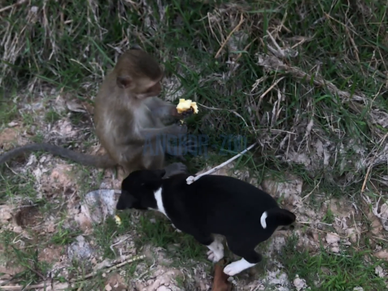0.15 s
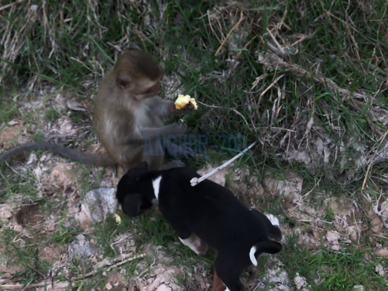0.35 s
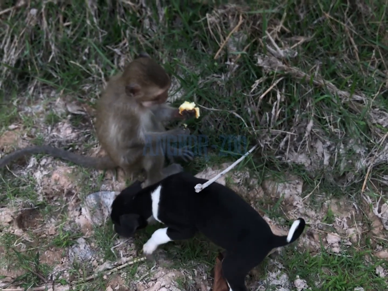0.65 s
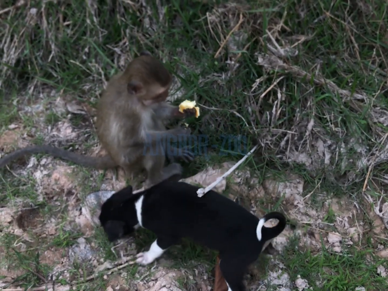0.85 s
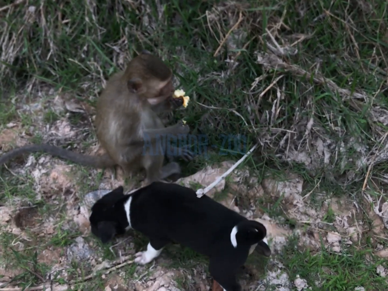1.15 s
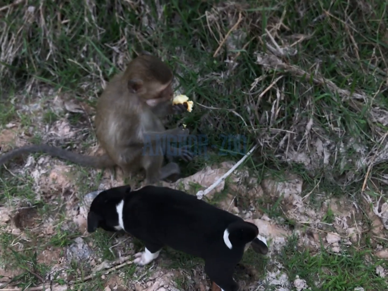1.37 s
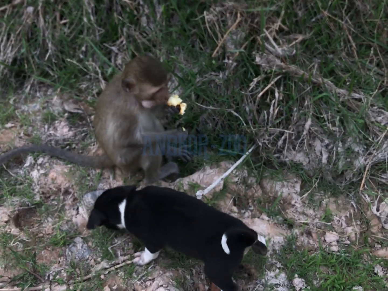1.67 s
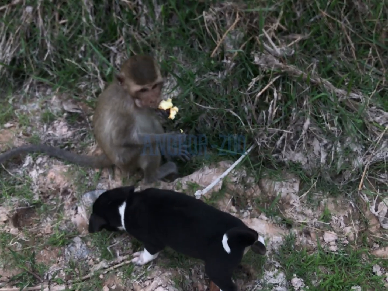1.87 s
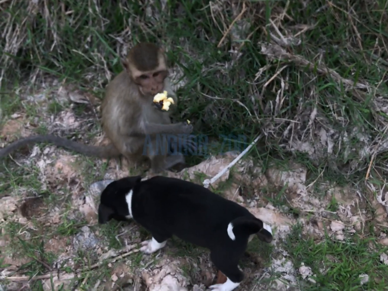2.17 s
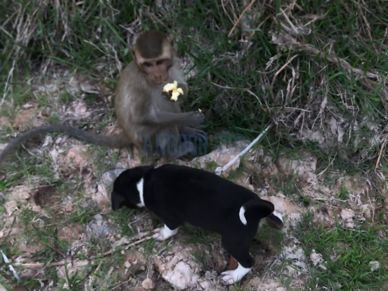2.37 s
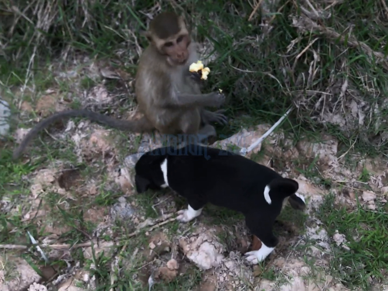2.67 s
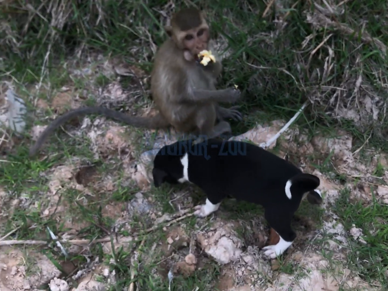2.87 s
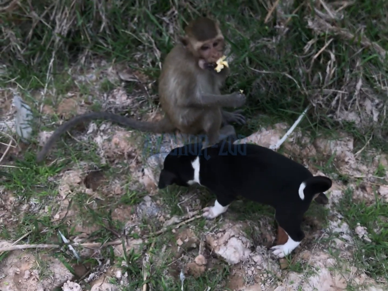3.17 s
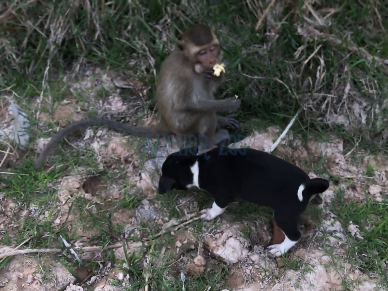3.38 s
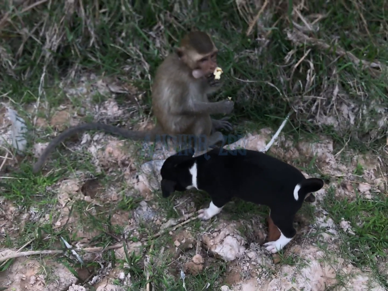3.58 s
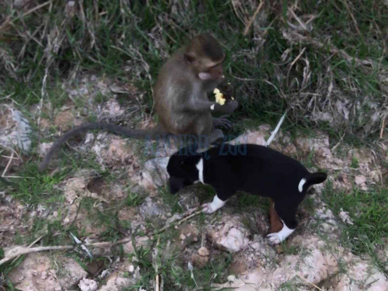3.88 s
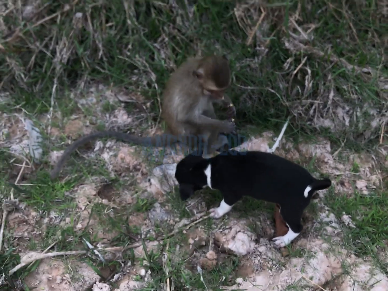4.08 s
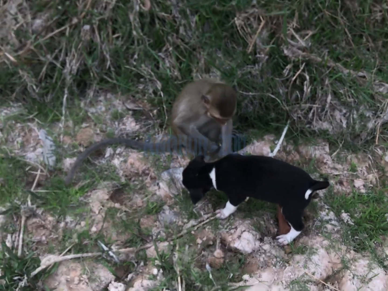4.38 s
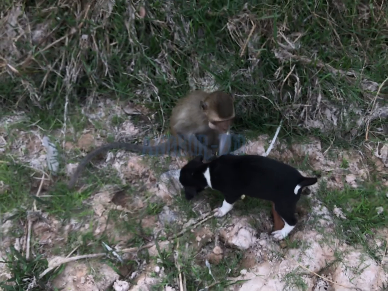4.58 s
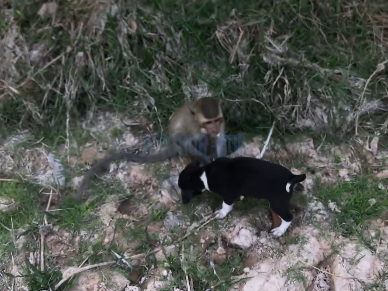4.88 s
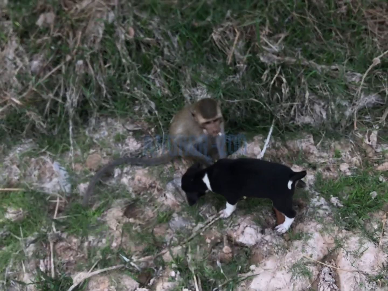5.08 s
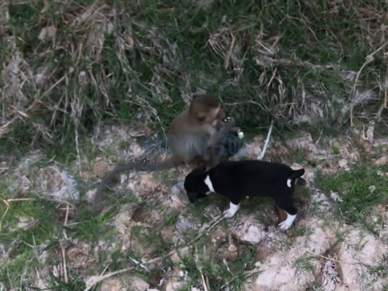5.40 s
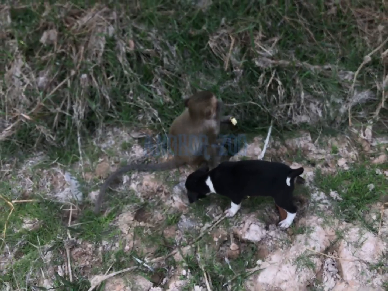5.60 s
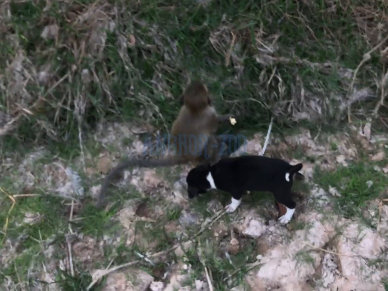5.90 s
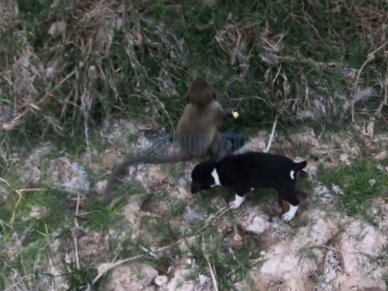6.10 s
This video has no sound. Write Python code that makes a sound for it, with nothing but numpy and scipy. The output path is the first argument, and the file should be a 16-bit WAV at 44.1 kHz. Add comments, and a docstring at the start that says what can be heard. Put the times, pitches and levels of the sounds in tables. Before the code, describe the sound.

On a grassy bank, a quick crackle of dry stalks is followed by light rustling and ticks of soil under paws. Throughout, a bird sings phrases of clear gliding whistles and a cricket repeats a thin buzz that slowly grows louder. Dull bumps and a knock touch the hand-held microphone, mostly in the second half. A low, distant engine rumble and soft outdoor hiss lie underneath.

```python
"""A songbird whistles phrases of scoops, falls, rises and held notes that scatter in the trees.
A bush cricket buzzes with its wings in swelling bursts; a second one pulses far off. On the grassy
bank, where a young monkey eats beside a puppy, dry stalks snap, grit ticks and grass rustles.
The hand-held camera knocks and thumps softly; an engine idles far off under open air and thin tones."""
import sys
import numpy as np
from scipy import signal
from scipy.fft import rfft, irfft
from scipy.io import wavfile
from scipy.ndimage import uniform_filter1d

SR = 44100
rng = np.random.default_rng(int(sys.argv[2]) if len(sys.argv) > 2 else 0)


def int16_out(signal):
    """Quantize to a 16-bit WAV file."""
    q = np.round(np.clip(np.atleast_2d(signal).T, -1, 1) * 32767)
    wavfile.write(sys.argv[1], SR, q.astype(np.int16))


N = 275625
TIME = np.arange(N) / SR

# spectrum of breaking dry fibre: freq_hz, gain_db
FIBRE_SPECTRUM = [(240, -49), (400, -20), (588, -24.5), (1090, -10.5), (1180, -17), (1870, -8.5),
                  (2880, -10), (3420, -4.5), (4650, -9), (7870, -11.5), (12300, -6), (14100, 2),
                  (16000, -22)]


def bird(flutter_db=2, overtone_db=-36, gain_db=-3.0, attack_s=.014, release_s=.0096):
    """Nearly pure whistles from the syrinx; pitch is least steady in fast glides."""
    out = np.zeros(N)
    waver = walk(260) + .8 * walk(55)
    flutter = undb(flutter_db * walk(60))
    for span, hz, db in [*scoops(), *falls(), *rises(), *holds()]:
        t = TIME[span]
        envelope = np.minimum((t - t[0]) / attack_s, 1) * np.minimum((t[-1] - t) / release_s, 1)
        glide_per_s = np.abs(np.gradient(np.log(hz))) * SR
        pitch_hz = hz * (1 + (.004 + .0035 * np.minimum(glide_per_s, 4)) * waver[span])
        whistle = tone(pitch_hz) + undb(overtone_db) * tone(2 * pitch_hz)
        out[span] += np.sqrt(2) * undb(db + gain_db) * envelope * whistle
    return foliage(out * flutter, t60_s=.68, wet_db=-4.5, near_db=-5.5, near_t60_s=.15)


def scoops(top_hz=3017, ref_depth_hz=600, down_s=.072, up_s=.088, entry_db=3.5, swell_db=8):
    """Pitch dips and climbs back, growing louder; shallow scoops are quicker."""
    # trough_s, end_s, low_hz, last_hz, relative_db
    notes = [(0.011, 0.104, 2293, 2848, -39), (0.229, 0.317, 2532, 2908, -40),
             (0.421, 0.466, 2643, 2800, -41), (2.402, 2.5, 2315, 2995, -44),
             (2.617, 2.693, 2450, 2883, -38.5), (2.802, 2.934, 2540, 2875, -42),
             (5.079, 5.161, 2315, 3100, -40), (5.288, 5.371, 2327, 2964, -40.5),
             (5.486, 5.572, 2648, 2880, -40)]
    for trough_s, end_s, low_hz, last_hz, db in notes:
        depth_hz = max(top_hz - low_hz, 1)
        stretch = np.sqrt(depth_hz / ref_depth_hz)
        span, _ = note_span(trough_s - stretch * down_s, end_s)
        t = (TIME[span] - trough_s) / stretch
        down = np.minimum(t / down_s, 0) ** 2
        up = np.sin(np.pi / 2 * np.clip(t / up_s, 0, 1)) ** 2
        pitch_hz = low_hz + depth_hz * down + (last_hz - low_hz) * up
        yield span, pitch_hz, db - entry_db * down + swell_db * up


def falls(ease=.0422, entry_db=4.5, entry_s=.017, fade_db=6):
    """Downward slides that start softly, ease midway and fade near the end."""
    # start_s, end_s, first_hz, last_hz, relative_db
    notes = [(.588, .72, 3660, 3080, -39), (.865, 1.08, 4380, 2080, -37.5), (2.93, 3.11, 3560, 2860, -38),
             (3.332, 3.53, 4300, 2000, -37), (5.58, 5.79, 3680, 2800, -37),
             (5.912, 6.095, 4150, 2420, -33.5)]
    for start_s, end_s, first_hz, last_hz, db in notes:
        span, progress = note_span(start_s, end_s)
        cut_db = entry_db * np.exp(-(TIME[span] - start_s) / entry_s) + fade_db * progress ** 4
        travel = progress + ease * np.sin(2 * np.pi * progress)
        yield span, first_hz * (last_hz / first_hz) ** travel, db - cut_db


def rises():
    """Climbing whistles; some overlap, from the two sides of the syrinx."""
    # start_s, end_s, first_hz, last_hz, bend (1 = straight), relative_db
    notes = [(.495, 0.592, 2740, 2960, 0.91, -38), (1.202, 1.514, 3525, 4670, 1.92, -41),
             (1.253, 1.43, 2650, 3260, 1.4, -52.5), (1.656, 1.736, 3850, 4320, 0.84, -41),
             (1.95, 2.09, 2900, 3310, 1.08, -49), (2.016, 2.076, 3950, 4310, 1.04, -45.5),
             (2.069, 2.162, 3140, 3937, 0.91, -38), (3.718, 4.035, 3486, 4835, 1.85, -40),
             (3.787, 3.947, 2810, 2980, 1.2, -55), (4.207, 4.266, 3880, 4430, 1.35, -40.5),
             (4.496, 4.67, 3170, 3450, 2.8, -52.5), (4.648, 4.72, 3266, 3438, 0.85, -37)]
    for start_s, end_s, first_hz, last_hz, bend, db in notes:
        span, progress = note_span(start_s, end_s)
        yield span, first_hz + (last_hz - first_hz) * progress ** bend, db


def holds(slide_hz=226, slide_s=.01405):
    """A quick slide up to a pitch that then barely drifts."""
    # start_s, end_s, pitch_hz, drift_hz_per_s, relative_db
    notes = [(1.708, 1.796, 3610, -200, -34.5), (1.899, 2.033, 3910, 50, -40),
             (4.264, 4.375, 3690, 153, -35), (4.467, 4.673, 3990, 745, -42.5)]
    for start_s, end_s, hz, drift_hz_per_s, db in notes:
        span, _ = note_span(start_s, end_s)
        t = TIME[span] - start_s
        yield span, hz + drift_hz_per_s * t - slide_hz * np.exp(-t / slide_s), db


def cricket(stroke_hz=194, wing_hz=8030, sweep_hz=900, swell_db=11, rasp_hz=130):
    """Each wing stroke is a short falling tone; a burst swells, then stops dead."""
    # start_s, end_s, final_db
    bursts = [(.25, 0.778, -52), (1.064, 1.573, -52), (1.825, 2.398, -51.5), (2.636, 3.217, -49.5),
              (3.447, 3.886, -49.5), (4.21, 4.741, -45.5), (5.02, 5.584, -43.5), (5.85, 6.36, -43.5)]
    stroke_phase = np.cumsum(stroke_hz * (1 + .021 * walk(40))) / SR % 1
    pitch_hz = wing_hz + sweep_hz * (.5 - stroke_phase) + rasp_hz * walk(1500) + 40 * walk(3)
    buzz = unit(tone(pitch_hz) * np.sin(np.pi * stroke_phase) ** 2)
    envelope = np.zeros(N)
    for start_s, end_s, db in bursts:
        remaining = np.clip((end_s - TIME) / (end_s - start_s), 0, 1)
        envelope += gate(start_s, end_s, edge_s=.0059) * undb(db - swell_db * remaining ** .81)
    return foliage(buzz * envelope, t60_s=.32, wet_db=-21)


def stalks(rasp=.34):
    """Dry fibres crack and briefly splinter; crushing adds finer crackle."""
    # start_s, relative_db, t60_s
    snaps = [(0.2767, -20, .01), (0.296, -19.5, .02), (0.2988, -14.5, 0.023), (.305, -20, 0.013),
             (0.314, -25, 0.012), (0.319, -26, 0.0089), (0.323, -25, 0.03), (.3438, -21, 0.011),
             (0.3517, -16, 0.0085), (.376, -8, 0.006), (0.3799, -17, 0.005), (0.3818, -15.5, 0.019),
             (2.604, -30, 0.014), (2.671, -28.5, 0.014), (2.689, -27.5, .01), (3.003, -25, 0.056),
             (3.088, -25, .006), (3.1725, -30, 0.0058), (3.211, -26, 0.015), (3.4903, -19, 0.005),
             (3.662, -26, .008)]
    # start_s, end_s, level_db
    crushes = [(0.278, 0.33, -32), (0.333, 0.376, -40.5), (2.723, 2.88, -42.5), (3.003, 3.024, -36)]
    out, t = np.zeros(N), TIME[:SR // 20]
    for start_s, db, t60_s in snaps:
        snap = rasp * rng.standard_normal(len(t)) * fade(t, t60_s)
        snap[0] = 2  # the crack
        add(out, start_s, 2 * undb(db) * snap)
    pressure = sum(gate(start_s, end_s, edge_s=.024) * undb(db) for start_s, end_s, db in crushes)
    crushing = pressure * unit(crackle(rate_hz=2200, spread_db=0))
    return colour(out + crushing, FIBRE_SPECTRUM)


def grit(t60_s=.049, rise_s=.004, gain_db=7.0):
    """Crumbs of dry soil tick and scrape under paws."""
    # time_s, relative_db, centre_hz
    ticks = [(0.905, -38.5, 1040), (1.403, -46, 552), (1.796, -43, 580), (2.833, -40.5, 1140),
             (3.057, -33.5, 920), (3.101, -33, 1070), (3.15, -37.5, 1050), (3.19, -44, 940),
             (3.25, -38.5, 1090), (3.307, -36, 1200), (3.661, -44, 1030), (3.904, -44, 915),
             (4.368, -40, 1110), (4.568, -36, 826)]
    out, t = np.zeros(N), TIME[:SR // 10]
    for time_s, db, hz in ticks:
        crumble = rng.standard_normal(len(t)) * fade(t, t60_s) * (1 - np.exp(-t / rise_s))
        spectrum = [(hz / 3, -8), (hz, 0), (hz * 4, -11), (hz * 9, -24)]
        add(out, time_s - rise_s, undb(db + gain_db) * colour(crumble, spectrum))
    return out


def grass(attack_s=.05, settle_s=.035, grain_db=-4, hiss_db=-2.0, calm_db=-46, uneven_db=3.7):
    """Blades brush in a fine uneven hiss; stronger stirring adds fuller crackle."""
    # start_s, end_s, relative_db
    brushes = [(0, 0.03, -42), (0.094, .28, -49.5), (0.386, 0.545, -49.5), (0.7, 0.728, -43),
               (1.344, 1.445, -48), (2.5, 2.685, -42), (2.693, 2.848, -45.5), (2.856, 3.03, -41.5),
               (3.053, 3.178, -50), (3.353, 3.476, -43.5), (3.591, 3.735, -42.5), (4.004, 4.71, -52),
               (4.782, 5.09, -45), (5.104, 5.33, -50.5), (5.58, 5.914, -47.5), (5.974, 6.028, -42)]
    # blade hiss: freq_hz, gain_db
    spectrum = [(2650, -39), (4500, -8.5), (4770, -19), (5810, -9), (6740, -12), (10500, -10),
                (14300, -0.5), (15300, -17), (16000, -84)]
    motion = np.zeros(N)
    for start_s, end_s, db in brushes:
        onset = np.clip((TIME - start_s) / attack_s, 0, 1)
        motion += undb(db) * onset * np.exp(-np.maximum(TIME - end_s, 0) / settle_s)
    stirring = np.clip(motion / undb(calm_db) - 1, .2, 1)
    hiss = undb(hiss_db) * unit(colour(rng.standard_normal(N), spectrum))
    clicks = crackle(rate_hz=450, spread_db=3)
    grains = undb(grain_db) * stirring * unit(colour(clicks, FIBRE_SPECTRUM))
    return motion * undb(uneven_db * walk(45)) * (hiss + grains)


def handling():
    """Fingers knock on the camera body and rub across it."""
    # start_s, relative_db, bright_hz
    knocks = [(0.716, -38, 400), (1.4048, -33.5, 700), (2.2414, -43, 395), (3.0303, -34, 400),
              (4.4324, -42, 350), (4.699, -21.5, 597), (4.7055, -34, 453), (4.716, -28, 550),
              (4.726, -36.5, 450), (5.7484, -30, 280)]
    # centre_s, half_width_s, level_db
    rubs = [(1.84, 0.2, -55), (3.943, 0.07, -51.5), (4.35, 0.3, -58.5), (4.638, 0.09, -45),
            (4.962, 0.071, -49.5), (5.108, 0.063, -46), (5.35, 0.2, -46)]
    out = np.zeros(N)
    for start_s, db, bright_hz in knocks:
        add(out, start_s, np.sqrt(2) * undb(db) * camera_ring(bright_hz))
    sliding = sum(undb(db) * np.exp(-((TIME - centre_s) / half_s) ** 2) for centre_s, half_s, db in rubs)
    friction = crackle(rate_hz=700, spread_db=.85)
    rub = signal.fftconvolve(friction, camera_ring(bright_hz=520))[:N]
    return out + sliding * unit(rub)


def camera_ring(bright_hz, rise_s=.0033):
    """Damped low modes of the camera body; softer contact weakens the upper ones."""
    # freq_hz, relative_db, t60_s
    modes = [(210, -65, 0.025), (264, 4, 0.066), (382, 11, 0.043), (538, 10, 0.033), (700, -31, .025)]
    t = TIME[:SR // 8]
    ring = np.zeros(len(t))
    for hz, db, t60_s in modes:
        detune = 1 + .11 * rng.standard_normal()
        gain = undb(db) / (1 + (hz / bright_hz) ** 4)
        ring += gain * np.sin(2 * np.pi * hz * detune * t) * fade(t, t60_s)
    ring *= 1 - np.exp(-t / rise_s)
    return ring / np.abs(ring).max()


def thumps(fall_per_s=11.0):
    """Soft bumps on the microphone: low swells of sinking pitch."""
    # peak_s, level_db, pitch_hz, half_width_s
    bumps = [(0.172, -24.5, 84.2, 0.024), (2.679, -24, 79, 0.031), (3.509, -35.5, 45.2, 0.084),
             (4.171, -24.5, 81.6, 0.035), (4.271, -31, 75.3, 0.037), (5.865, -29, 70.8, 0.029)]
    out, t = np.zeros(N), TIME[:SR // 4] - .125
    for peak_s, db, hz, half_s in bumps:
        swell = np.sqrt(2) * undb(db) * np.exp(-(t / half_s) ** 2)
        add(out, peak_s + t[0], swell * tone(hz * np.exp(-fall_per_s * t)))
    return out


def far_cricket(pitch_hz=5150, pulse_hz=6.2):
    """A distant cricket: one faint note in loose pulses."""
    # start_s, end_s, relative_db
    spells = [(.75, 2.05, -57.5), (3.7, 5.9, -58)]
    envelope = sum(undb(db) * gate(start_s, end_s, edge_s=.5) for start_s, end_s, db in spells)
    pulsing = .5 + .5 * tone(pulse_hz * (1 + .223 * walk(3.2)))
    flutter = undb(2 * walk(14))
    note = tone(pitch_hz + 45 * walk(120))
    return foliage(envelope * pulsing * flutter * note, t60_s=.29, wet_db=-7.5)


def engine(firing_hz=20.83, scatter_db=1.0, throb_db=-40.5, growth_db_per_s=.09):
    """Far-off idle: only the bass of the uneven firings arrives, blurred by rumble."""
    # freq_hz, gain_db
    spectrum = [(13, -56), (22, -55), (40, 0), (59, 6), (108, 3), (144, -2.5), (172, -21), (195, -21),
                (260, -24), (340, -50), (570, -120)]
    cycles = np.cumsum(firing_hz * (1 + .02627 * walk(6))) / SR
    firings = np.diff(np.floor(cycles), prepend=0) * undb(scatter_db * walk(22.31))
    bass = colour(firings - firings.mean(), spectrum)
    throb = unit(foliage(bass, t60_s=.21, wet_db=-3))
    rumble = unit(colour(rng.standard_normal(N), spectrum))
    return undb(throb_db + growth_db_per_s * TIME) * (throb + .8 * rumble)


def air(level_db=-44, swell_db=.5):
    """Open air: soft noise that swells slightly."""
    # freq_hz, gain_db
    spectrum = [(88, -28.5), (150, 3), (190, -4.5), (244, -8), (759, -16.5), (1420, -14), (2100, -19),
                (3620, -18), (4860, -23.5), (6640, -24.5), (8900, -23), (10400, -27), (12700, -16),
                (14200, -19), (16000, -20)]
    return unit(colour(rng.standard_normal(N), spectrum)) * undb(level_db + swell_db * walk(2.37))


def far_tones(gain_db=-4):
    """Thin drawn-out tones that waver and blur over distance."""
    # start_s, end_s, pitch_hz, relative_db
    notes = [(0.348, .72, 1536, -57), (2.58, 3.195, 1400, -57), (3.55, 3.85, 1580, -62),
             (5.46, 5.8, 1022, -57), (5.93, 6.09, 1060, -52)]
    waver = 1 + .012 * walk(7) + .014 * walk(90)
    tones = sum(gate(start_s, end_s, edge_s=.025) * undb(db + gain_db) * tone(hz * waver)
                for start_s, end_s, hz, db in notes)
    return foliage(tones, t60_s=.6, wet_db=5)


def foliage(x, t60_s, wet_db, near_db=-40, near_t60_s=.12):
    """Ground and near leaves scatter briefly; farther trees add a diffuse tail."""
    t = TIME[:SR]
    scatter = rng.standard_normal((2, SR)) * (1 - np.exp(-t / .029))
    near, far = scatter * [fade(t, near_t60_s), fade(t, t60_s)]
    response = undb(near_db) * near / np.linalg.norm(near) + undb(wet_db) * far / np.linalg.norm(far)
    return x + signal.fftconvolve(x, response)[:N]


def colour(x, points, size=8192, skirt_db_per_oct=24):
    """Unit-energy minimum-phase filter shaped by (freq_hz, gain_db) points."""
    hz, db = np.transpose(points)
    octave = np.log2(np.maximum(np.fft.rfftfreq(size, 1 / SR), 1))
    outside_oct = np.abs(octave - np.clip(octave, np.log2(hz[0]), np.log2(hz[-1])))
    gain_db = np.interp(octave, np.log2(hz), db) - skirt_db_per_oct * np.minimum(outside_oct, 3)
    cepstrum = irfft(np.log(undb(gain_db)))
    causal = 2 * cepstrum[:size // 2] * (np.arange(size // 2) > 0)
    response = irfft(np.exp(rfft(causal, size)))
    return signal.fftconvolve(x, response / np.linalg.norm(response))[:len(x)]


def crackle(rate_hz, spread_db):
    """Randomly timed clicks; spread_db makes a few larger."""
    sizes = undb(spread_db * np.minimum(rng.exponential(size=N), 5))
    return (rng.random(N) < rate_hz / SR) * sizes * rng.choice([-1, 1], N)


def walk(rate_hz):
    """Smooth random drift, spread near 1."""
    hold = int(SR / rate_hz)
    steps = np.repeat(rng.standard_normal(N // hold + 1), hold)
    return 1.3 * uniform_filter1d(uniform_filter1d(steps, hold), hold)[:N]


def note_span(start_s, end_s):
    """A note's sample indices and progress (0-1)."""
    span = np.arange(*np.searchsorted(TIME, [start_s, end_s]))
    return span, (TIME[span] - start_s) / (end_s - start_s)


def gate(start_s, end_s, edge_s):
    """On between two times, with ramped edges."""
    return np.clip((TIME - start_s) / edge_s + .5, 0, 1) * np.clip((end_s - TIME) / edge_s + .5, 0, 1)


def tone(hz):
    """Sine following a pitch curve."""
    return np.sin(2 * np.pi * np.cumsum(hz) / SR)


def fade(t, t60_s):
    """Exponential decay, 60 dB in t60_s."""
    return np.exp(-np.log(1000) * t / t60_s)


def add(out, start_s, x):
    """Mix x into out from start_s."""
    i = int(np.clip(start_s * SR, 0, N - 1))
    out[i:i + len(x)] += x[:N - i]


def undb(db):
    """Decibels to gain."""
    return 10 ** (np.asarray(db) / 20)


def unit(x):
    """Scale to rms 1."""
    return x / np.sqrt(np.mean(x ** 2) + 1e-18)


def scene():
    """One microphone, the same in both channels."""
    animals = bird() + cricket() + far_cricket()
    ground = stalks() + grit() + grass()
    mono = animals + ground + handling() + thumps() + engine() + air() + far_tones()
    return np.array([mono, mono])


def record(dry):
    """Steep low-pass on the top treble."""
    cutoff_hz = 15800
    return signal.sosfilt(signal.ellip(10, .2, 70, cutoff_hz, fs=SR, output="sos"), dry)


dry = scene()
out = record(dry)
int16_out(out)
```